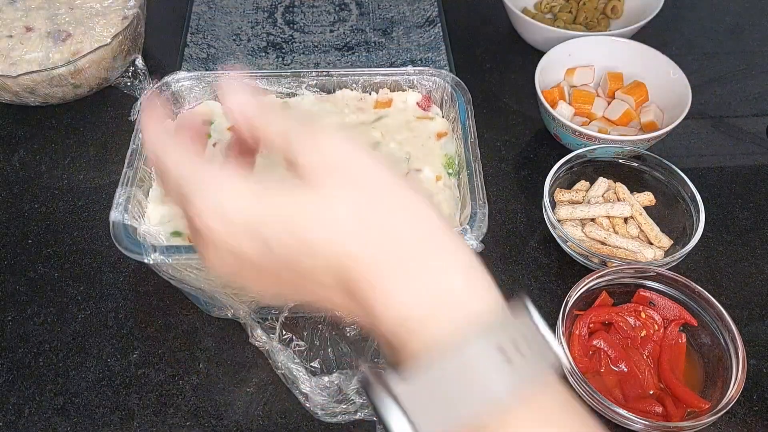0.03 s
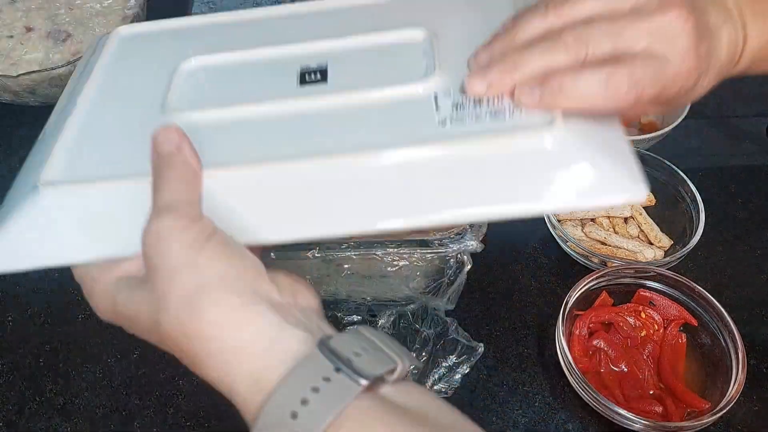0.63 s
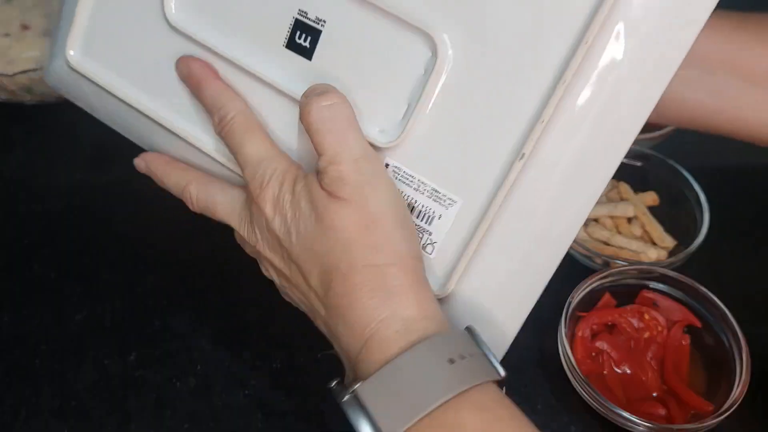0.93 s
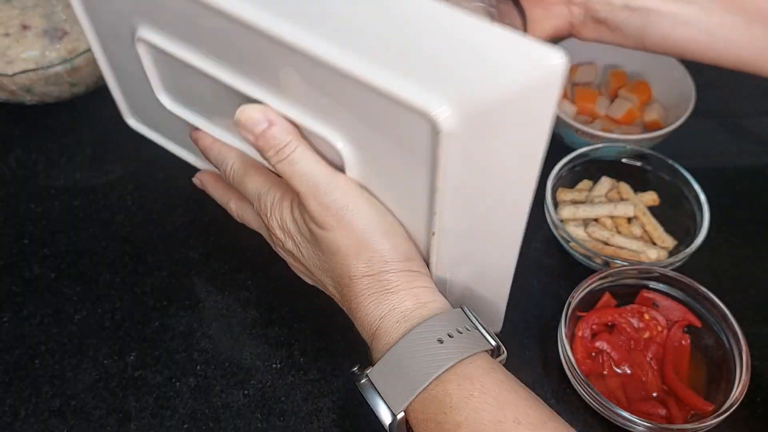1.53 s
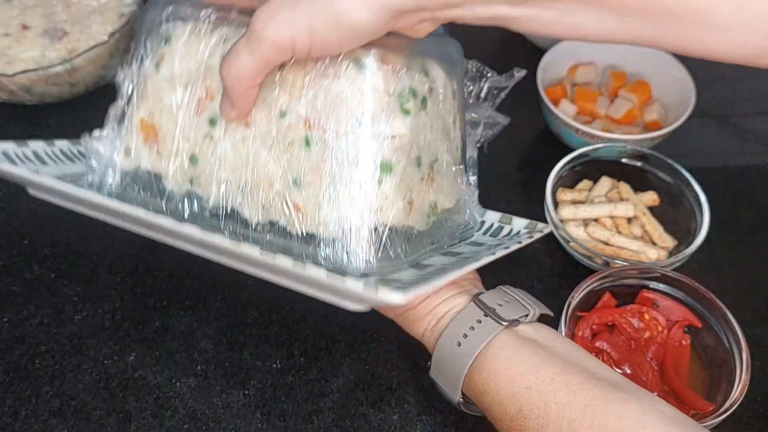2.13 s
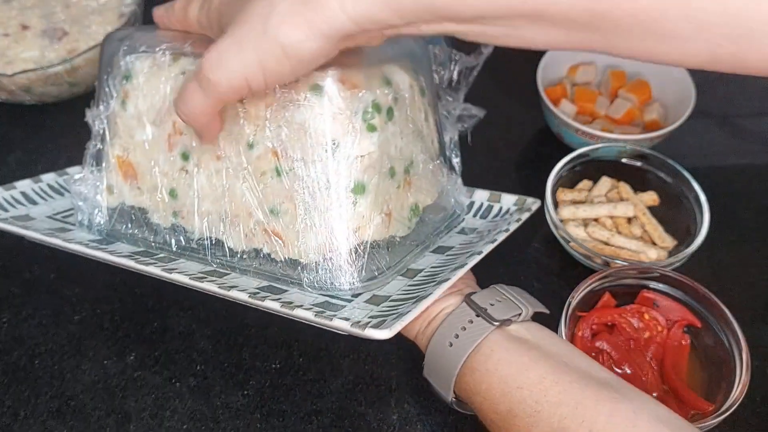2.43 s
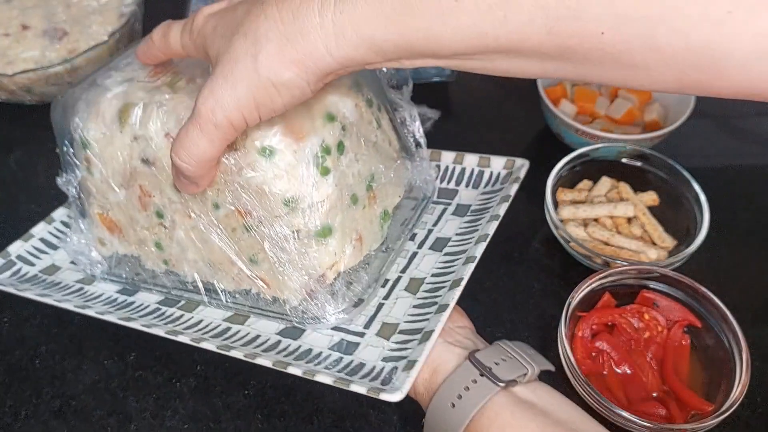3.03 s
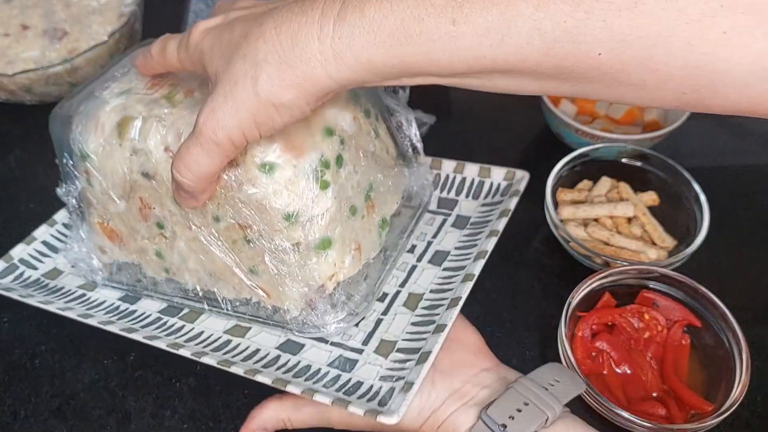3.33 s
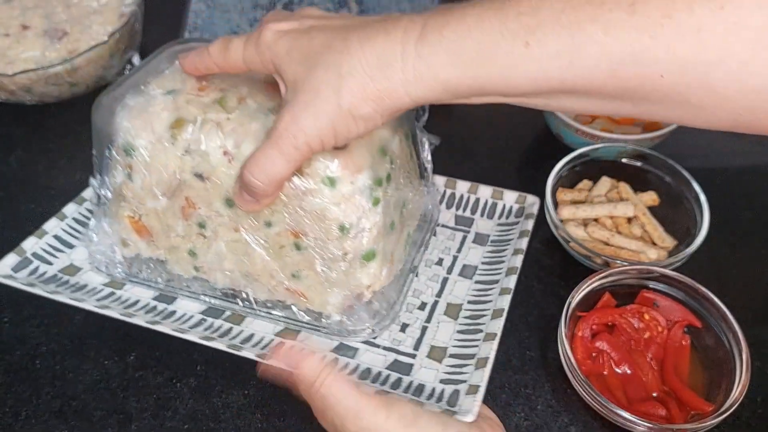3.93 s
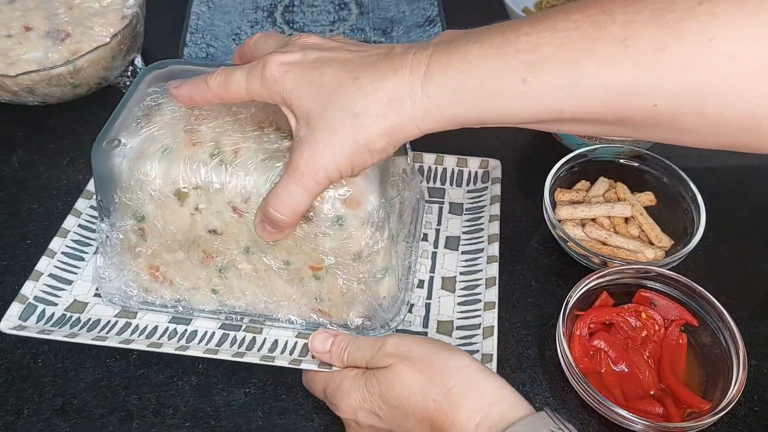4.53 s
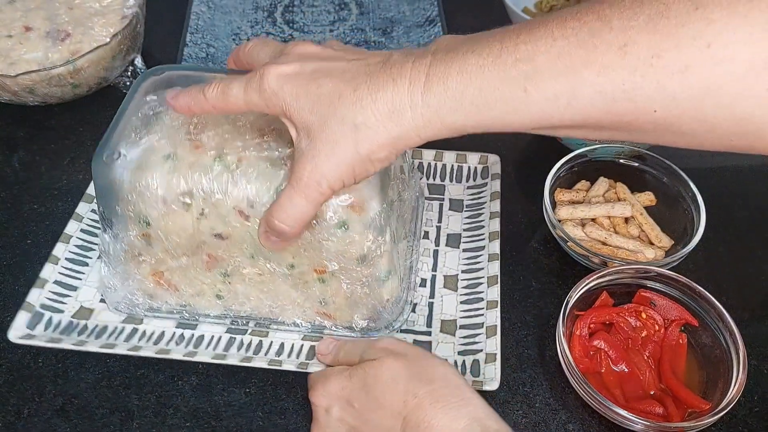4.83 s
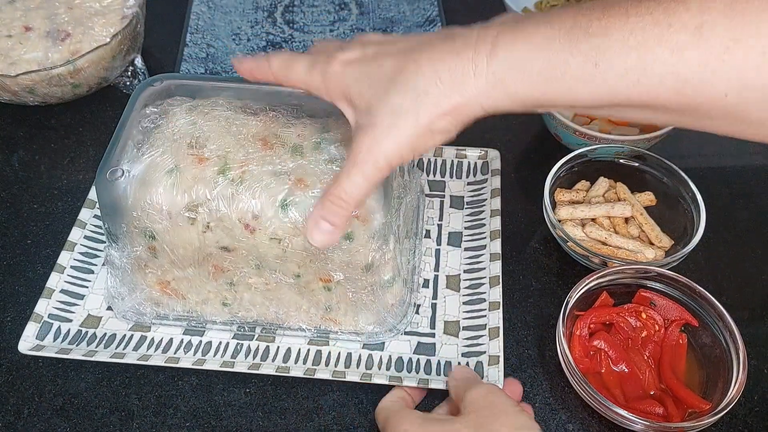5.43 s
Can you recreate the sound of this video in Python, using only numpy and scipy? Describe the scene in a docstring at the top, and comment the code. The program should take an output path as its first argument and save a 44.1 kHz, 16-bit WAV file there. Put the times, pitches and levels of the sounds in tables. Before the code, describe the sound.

A soft bump and a swish of hands open the scene in a small kitchen, heard close with a short room echo. Near 0.9 seconds come a brief squeak, light clinks and a crinkle of cling film, then faint brushing. At 2.2 seconds a filled glass dish, turned over onto a ceramic tray, gives a loud, briefly ringing knock. A smaller knock follows at 2.7 seconds, and the dish rocks with light clinks until about 3. The film rustles, a short falling squeak sounds at 3.1, and the dish rubs dully on the tray. At about 4.15 seconds the tray lands on the counter with the loudest knock and a quick clatter. It scrapes grittily until 4.6, followed by two short chirping nudges. A clink at 5.1 and faint crinkles and taps finish the action. An appliance hums and whines faintly throughout.

```python
"""A filled glass dish in cling film is turned over onto a ceramic serving tray in a small kitchen.
Each impact excites the damped modes of dish and tray; lighter touches make them and a bowl clink.
Stick-slip friction does the rest: the film rustles, hands swish and squeak, the dish rubs,
and the tray, once set down, scrapes over the counter as it is pushed into place.
An appliance hums and whines behind it all."""
import sys
import numpy as np
from scipy import signal
from scipy.fft import rfft, irfft, next_fast_len
from scipy.io import wavfile
from scipy.ndimage import uniform_filter1d

SR = 44100
rng = np.random.default_rng(int(sys.argv[2]) if len(sys.argv) > 2 else 0)


def dump(signal):
    """Clip the signal to [-1, 1] and save it as 16-bit WAV at the path in sys.argv[1]."""
    limited = np.clip(np.atleast_2d(signal).T, -1, 1)
    pcm = np.round(limited * 32767).astype(np.int16)
    wavfile.write(sys.argv[1], SR, pcm)


N = 251255
TIME = np.arange(N) / SR
FFT_SIZE = next_fast_len(N, real=True)

# Modes of the filled glass dish. Each row: frequency in Hz, relative level in dB.
DISH_MODES = [(69.6, -18.5), (137.6, -7.5), (204.3, -9), (510, 3.5), (650, 1), (738, 5.5), (795, 2.5),
              (1168, 3), (1350, 9.5), (1577, 0.5), (2256, -1), (2360, -1), (2532, 9.5), (2985, 3),
              (3110, -4.5), (3765, -3), (4050, -8), (4710, -4.5), (5560, 0), (6350, -8.5), (6508, -3),
              (7860, -4.5), (8200, 0), (10890, -10.5), (12060, -9.5)]
# Noise spectrum of the dish's knocks and of all clinks. Each row: frequency in Hz, relative level in dB.
IMPACT_SPECTRUM = [(50, -16.5), (170, -7.5), (330, -17.5), (580, 1.5), (950, -9.5), (1300, -10.5),
                   (2500, -3.5), (3500, -9.5), (5500, -16.5), (9000, -20.5), (12500, -20), (15500, -20.5)]


def undb(db):
    """Amplitude ratio for a level in decibels."""
    return 10 ** (np.asarray(db) / 20)


def unit(x):
    """Normalisation to an rms of 1."""
    return x / np.sqrt(np.mean(x ** 2) + 1e-30)


def fade(t, t60):
    """Exponential decay, 60 dB down at t60 seconds."""
    return np.exp(-np.log(1000) * t / t60)


def curve(points):
    """Linear interpolation in time between (seconds, value) points."""
    return np.interp(TIME, *np.transpose(points))


def freqs(size):
    """Bin frequencies in Hz of a transform of this size, at least 1 Hz."""
    return np.maximum(np.fft.rfftfreq(size, 1 / SR), 1)


def peak(offset, width):
    """Lorentzian resonance curve, with its full width at half height."""
    return 1 / (1 + (2 * offset / width) ** 2)


def colour(x, spectrum):
    """Spectral shaping by (Hz, dB) points joined on a logarithmic frequency axis."""
    hz, db = np.transpose(spectrum)
    size = next_fast_len(x.shape[-1], real=True)
    gain = undb(np.interp(np.log(freqs(size)), np.log(hz), db))
    return irfft(rfft(x, size) * gain, size)[..., :x.shape[-1]]


def pan(db):
    """Stereo gains for a level difference of left over right."""
    return undb(np.array([[db], [-db]]) / 2)


def diffuse(size, coherent_below_hz=620):
    """A diffuse noise field at two nearby points: coherent in the bass, independent above."""
    mid, side = rng.standard_normal((2, next_fast_len(size, real=True)))
    coherence = .93 / (1 + (freqs(len(mid)) / coherent_below_hz) ** 4)
    common = rfft(mid) * np.sqrt(1 + coherence)
    opposed = np.array([[1], [-1]]) * rfft(side) * np.sqrt(1 - coherence)
    return unit(irfft(common + opposed, len(mid))[:, :size])


def kitchen(x, wet_db=0, room_db=3.5, t60=0.3):
    """Reverberation: direct sound, then dense reflections from counter, cupboards and tiles."""
    t, wet = TIME[:SR // 2], undb(room_db + wet_db)
    response = diffuse(len(t)) * fade(t, t60) * (1 - np.exp(-t / 0.0019))
    response *= wet / np.sqrt(np.sum(response ** 2) / 2)
    response[:, 0] += 1  # direct path
    return signal.fftconvolve(np.atleast_2d(x), response, axes=1)[:, :x.shape[-1]] / np.hypot(1, wet)


def resonate(x, modes, lift_db, width_hz=22, width_share=0.015):
    """Forced response: a body favours frequencies near its modes; high modes are broader."""
    f = freqs(x.shape[-1])
    nearness = sum(peak(f - hz, 2 * (width_hz + width_share * hz)) ** 2 for hz, _ in modes)
    return irfft(rfft(x) * undb(lift_db * np.minimum(nearness, 1.2)), x.shape[-1])


def tones(modes, t60, split=0.0036):
    """Free vibration: each mode decays as a beating pair, slightly detuned with every grip."""
    t = TIME[:SR // 2]
    out = 0
    for hz, db in modes:
        phase = rng.uniform(0, 2 * np.pi, (2, 1, 1))
        # short waves reach the two sides out of step
        phase = phase + min(hz / 1100, .8) * rng.choice([-1, 1]) * np.array([[1], [-1]])
        pair_hz = hz * (1 + split * rng.uniform(-1, 1, (2, 1, 1)))
        main, twin = np.sin(2 * np.pi * pair_hz * t + phase)
        out = out + undb(db) * fade(t, t60) * (main + .5 * twin)
    return out


def friction(slips_per_s, spread_db):
    """Friction as shot noise: tiny slips of uneven strength at random moments."""
    slips = rng.random(FFT_SIZE) < slips_per_s / SR
    strength = undb(spread_db * np.minimum(rng.exponential(size=FFT_SIZE), 4))
    return unit(slips * strength * diffuse(FFT_SIZE))


def judder(pitch_hz, width_hz, slips_per_s):
    """Amplitude modulation: each slip rings briefly at a moving pitch."""
    lowpass = signal.butter(2, width_hz / 2, fs=SR, output="sos")
    slips = signal.sosfilt(lowpass, friction(slips_per_s, spread_db=1.0))
    return unit(slips[:, :N] * np.sin(2 * np.pi * np.cumsum(pitch_hz) / SR))


def flutter(depth_db, samples):
    """Gain that wavers with quick random changes of contact pressure."""
    return undb(depth_db * unit(uniform_filter1d(rng.standard_normal(N), samples)))


def stroke(start, length, skew=1, taper=1):
    """Speed of a hand that accelerates and comes to rest; a skew under 1 makes it peak early."""
    progress = np.clip((TIME - start) / length, 0, 1)
    moving = (progress > 0) & (progress < 1)
    speed = np.zeros(N)
    speed[moving] = np.sin(np.pi * progress[moving] ** skew) ** taper
    return speed


def strokes(rows, skew, taper):
    """Envelope of a series of movements: friction noise follows sliding speed."""
    return sum(undb(db) * stroke(start, length, skew, taper) for start, length, db, *_ in rows)


def room_air(level_db=-62.5):
    """Ambient noise: a steady diffuse field, strongest in the bass."""
    # Each row: frequency in Hz, relative spectral density in dB.
    air_spectrum = [(25, -39), (55, -8.5), (120, -10), (190, -7.5), (370, -12), (750, -21.5), (1100, -33),
                    (1800, -35), (3300, -43.5), (5900, -43.5), (8200, -36), (10000, -44), (12000, -48),
                    (16000, -61)]
    return unit(colour(diffuse(N), air_spectrum)) * undb(level_db)


def appliance():
    """Noise-driven resonances hum and hiss; closely spaced partials beat in a whine."""
    # Each row: frequency in Hz, level in dB, bandwidth in Hz.
    resonances = [(62.5, -78, 8.1), (153.1, -66.5, 3.5), (213.6, -65, 22), (2620, -81.5, 130),
                  (7930, -88, 90)]
    # Each row: frequency in Hz, level in dB before the swell.
    partials = [(2578, -81.5), (2627, -81.5), (2676, -95.5), (2724, -80.5), (2772, -93.5)]
    # Swell of hiss and whine. Each row: time in seconds, gain in dB.
    swell = [(0, -7), (.6, -2), (1.1, 2.5), (1.9, 2), (2.5, 6.5), (5.7, -2)]
    noise, f = rfft(diffuse(FFT_SIZE)), freqs(FFT_SIZE)
    bands = noise * sum(undb(db) * unit(peak(f - hz, width)) for hz, db, width in resonances)
    hum, hiss = (irfft(bands * part, FFT_SIZE)[:, :N] for part in (f < 1000, f >= 1000))
    whine = sum(undb(db) * np.sqrt(2) * np.sin(2 * np.pi * hz * TIME + rng.uniform(0, np.pi, (2, 1)))
                for hz, db in partials)
    return hum + (hiss + whine) * undb(curve(swell))


def hand_brush(level_db=-58, attack_s=0.01, t60=1.5):
    """Dry friction: as a hand brushes past, dense slips merge into a swish that dies away."""
    # Each row: frequency in Hz, relative level in dB.
    skin_spectrum = [(900, -43), (2200, 2), (3100, -1.5), (4600, -7), (6000, -22), (10000, -27)]
    swish = unit(colour(friction(slips_per_s=5200, spread_db=5.0), skin_spectrum)[:, :N])
    return kitchen(swish * undb(level_db) * (1 - np.exp(-TIME / attack_s)) * fade(TIME, t60))


def palm_sweeps():
    """Band-limited friction noise falls in pitch as each palm slides over the back of the tray."""
    # Each row: start and length in seconds, level in dB, first and last pitch in Hz.
    sweeps = [(0.02, 0.18, -62, 3600, 2840), (1.1, 0.23, -71, 2700, 1616), (1.36, .2, -72.5, 1887, 1472)]
    pitch_hz = curve([point for start, length, _, first_hz, last_hz in sweeps
                      for point in ((start, first_hz), (start + length, last_hz))])
    swish = judder(pitch_hz, width_hz=690, slips_per_s=3500)
    return kitchen(swish * strokes(sweeps, skew=0.92, taper=0.61))


def film_rustle(held_db=-71, fold_rise_s=0.0039, fold_t60=0.067):
    """Friction and buckling: cling film rustles under the fingers and crackles as folds give way."""
    # Each row: frequency in Hz, relative level in dB.
    film_spectrum = [(500, -5), (1500, -10), (2500, 1.5), (3500, -0.5), (5000, -1), (6100, -1.5),
                     (7000, -2.5), (8200, -1), (9700, -4), (12100, 0.5), (13500, -3.5), (15500, -3.5)]
    # Fingers dragging over the film. Each row: start and length in seconds, level in dB.
    drags = [(1.05, 0.25, -60), (1.35, 0.23, -65), (2.38, 0.079, -62.5), (2.54, 0.13, -58),
             (2.71, 0.1, -51), (2.812, 0.031, -46), (2.895, 0.06, -46), (3.04, 0.17, -59.5),
             (3.17, 0.25, -53), (3.39, 0.41, -61.5), (3.6, 0.26, -63), (3.87, 0.11, -60),
             (4.05, 0.14, -64.5), (4.3, 0.36, -53.5), (5.46, 0.86, -58)]
    # Each row: start in seconds, level in dB.
    crinkles = [(0.848, -45), (0.879, -40), (3.04, -39), (3.622, -49), (5.27, -42), (5.327, -50.5),
                (5.535, -47)]
    crackle = unit(colour(friction(slips_per_s=1300, spread_db=3.8), film_spectrum)[:, :N])
    folds = sum(undb(db) * np.clip((TIME - s) / fold_rise_s, 0, 1) * fade(np.abs(TIME - s), fold_t60)
                for s, db in crinkles)
    held = undb(held_db) * stroke(start=0.89, length=5.4)  # a faint stir while the dish is held
    envelope = np.sqrt(strokes(drags, skew=0.66, taper=0.99) ** 2 + folds ** 2 + held ** 2)
    return kitchen(crackle * envelope * flutter(2.3, samples=500), wet_db=3.0) * pan(-0.61)


def squeaks(settle_s=0.00594, roughness=0.097):
    """Stick-slip oscillation of damp skin and film on the glaze; the pitch falls as the slip slows."""
    # Each row: start and length in seconds, first and settled pitch in Hz, level in dB.
    slips = [(0.857, 0.02, 475, 460, -33.5), (3.117, 0.039, 1274, 754, -32)]
    out = np.zeros(N)
    for s, length, first_hz, settled_hz, db in slips:
        t, start = TIME[:int(length * SR)], int(s * SR)
        waver = unit(uniform_filter1d(rng.standard_normal(len(t)), size=60))
        glide_hz = settled_hz + (first_hz - settled_hz) * np.exp(-t / settle_s)
        phase = 2 * np.pi * np.cumsum(glide_hz * (1 + roughness * waver)) / SR
        swell = np.sin(np.pi * (t / length) ** 0.91)
        out[start:start + len(t)] += undb(db) * swell * (np.sin(phase) + undb(-31) * np.sin(2 * phase))
    return kitchen(out, wet_db=-8.5)


def dish_rub():
    """Forced vibration: friction of the wrapped dish and the hand on the tray drives the dish's modes."""
    # Each row: frequency in Hz, relative level in dB.
    rub_spectrum = [(80, -5), (220, 3.5), (350, 3.5), (750, 2), (1050, -7), (1400, -4), (2300, -4),
                    (3200, -22), (4500, -28), (7000, -29)]
    # Each row: start and length in seconds, level in dB.
    rubs = [(-.04, 0.075, -44), (.02, 0.44, -63.5), (2.52, 0.14, -55.5), (2.75, 0.31, -51.5),
            (3.03, 0.25, -48.5), (3.205, 0.18, -46.5), (3.42, 0.15, -48), (3.6, .11, -50.5),
            (3.7, 0.31, -57.5), (4.08, 0.19, -51.5)]
    drive = colour(friction(slips_per_s=1300, spread_db=-1.5), rub_spectrum)
    body = unit(resonate(drive, DISH_MODES, lift_db=4.5)[:, :N])
    return kitchen(body * strokes(rubs, skew=0.5, taper=0.63)) * pan(-1.0)


def clinks(modes, touches, t60, tick_db, wet_db, tick_t60=0.075):
    """Light impacts: a tick and a few clear modes, weighted by the point of contact."""
    t = TIME[:SR // 2]
    out = np.zeros((2, N))
    for s, db, favoured_hz, boost_db in touches:
        struck = [(hz, level + boost_db * peak(hz / favoured_hz - 1, 0.2)) for hz, level in modes]
        ringing = unit(tones(struck, t60))
        tick = unit(colour(diffuse(len(t)), IMPACT_SPECTRUM) * fade(t, tick_t60))
        clink = ringing + undb(tick_db) * tick
        start = int(s * SR)
        out[:, start:start + len(t)] += clink / clink[:, :SR // 30].std() * undb(db)
    return kitchen(out, wet_db)


def tableware():
    """Modal ringing of a grazed glass bowl, the lifted tray and the dish seated on the tray."""
    # Each row: frequency in Hz, relative level in dB.
    bowl_modes = [(980, -2), (1480, 2.5), (2099, 1.5), (5700, -11), (6465, -13)]
    free_tray_modes = [(850, -1.5), (1440, 0), (2320, -1.5), (3320, -1), (4570, -3), (5800, -7),
                       (8000, -1.5)]
    seated_dish_modes = [(1950, 3), (2130, 11), (2240, 6.5), (2480, -8), (2830, 1), (3860, -21),
                         (4715, -2.5), (4870, -4), (5518, -6), (5955, -9), (7860, -7.5)]
    # Each row: start in seconds, level in dB, favoured frequency in Hz, its boost in dB.
    bowl_touches = [(.249, -53, 2099, 1.5)]
    free_tray_touches = [(0.857, -58, 1440, 5), (0.878, -51.5, 850, 3), (0.8834, -50.5, 4570, 4)]  # as the tray is lifted and lowered onto the dish
    seated_dish_taps = [(2.7074, -37, 2830, 3.5), (2.901, -50, 4715, -6), (2.926, -48, 5955, 9),
                        (3.0425, -51, 5955, 21)]  # as the dish rocks
    return (clinks(bowl_modes, bowl_touches, t60=0.24, tick_db=-4.0, wet_db=-14.0)
            + clinks(free_tray_modes, free_tray_touches, t60=0.12, tick_db=-4.5, wet_db=-10.5)
            + clinks(seated_dish_modes, seated_dish_taps, t60=0.12, tick_db=-12.5, wet_db=-12.0))


def scrape_pitch(pushes, rise_hz_per_s=325):
    """Linear glide: within each push the scrape climbs from its starting pitch."""
    pitch_hz = np.full(N, float(pushes[0][3]))
    for start, _, _, hz in pushes:
        pitch_hz = np.where(TIME > start, hz + rise_hz_per_s * np.minimum(TIME - start, .5), pitch_hz)
    return pitch_hz


def through_foot(x, width_hz=80):
    """Resonant filtering: scraping enters the tray where its foot presses on the counter."""
    # Each row: frequency in Hz, boost in dB.
    resonances = [(835, 4.5), (1030, 2.5), (1430, 9), (1915, 11.5), (2400, 7.5), (3110, 6), (3830, 12),
                  (4900, 18.5)]
    lift_db = sum(db * peak(freqs(FFT_SIZE) - hz, width_hz) for hz, db in resonances)
    return unit(irfft(rfft(x, FFT_SIZE) * undb(lift_db), FFT_SIZE)[:, :N])


def tray_slide(chirp_db=2.0):
    """Stick-slip friction: the tray grinds over the counter, then two nudges swell to gritty chirps."""
    # Each row: frequency in Hz, relative level in dB.
    grit_spectrum = [(150, -40), (400, -4.5), (700, -0.5), (1000, 0.5), (1450, -2), (1900, -3.5),
                     (2400, -5), (3150, -8.5), (3550, -16.5), (4250, -21), (4900, -26), (6200, -29.5),
                     (12000, -37)]
    # Each row: start and length in seconds, level in dB, starting pitch in Hz.
    pushes = [(4.245, 0.35, -36.5, 813), (4.312, 0.041, -40.5, 850), (4.372, 0.051, -43, 800),
              (4.415, 0.049, -41, 850), (4.488, 0.038, -38.5, 902.5), (4.585, 0.031, -49, 917)]
    nudges = [(4.712, 0.071, -43.5, 1120), (4.84, 0.074, -42, 1080)]
    grit = unit(colour(friction(slips_per_s=420, spread_db=3.6), grit_spectrum)[:, :N])
    scrape = through_foot(grit + judder(scrape_pitch(pushes), width_hz=310, slips_per_s=630))
    dull_grit = signal.lfilter(*signal.butter(1, 2300, fs=SR), grit)
    light_grit = unit(signal.sosfilt(signal.butter(2, 850, "highpass", fs=SR, output="sos"), dull_grit))
    chatter = judder(scrape_pitch(nudges), width_hz=250, slips_per_s=900)
    chirp = through_foot(light_grit + undb(chirp_db) * chatter)
    moves = scrape * strokes(pushes, skew=0.67, taper=0.65)
    moves += chirp * strokes(nudges, skew=1.96, taper=1.2)
    return kitchen(moves * flutter(2.7, samples=300), wet_db=-1.5)


def ring(modes, spectrum, t60, weak_db, crack_db, crack_t60, snap_db, spacing_hz=40):
    """Impulse response of a body: a snap, a noisy crack, clear modes and a crowd of weaker ones."""
    t = TIME[:SR // 2]
    noise, f = rfft(diffuse(len(t))), freqs(len(t))
    present = rng.random(len(f)) < SR / len(t) / spacing_hz  # weak modes lie at random frequencies
    weak = colour(irfft(noise * present * (f > 400), len(t)), spectrum) * fade(t, t60=0.27)
    burst = colour(diffuse(len(t)), spectrum)
    burst = resonate(burst, modes, lift_db=7.0, width_hz=69.0, width_share=0.022)
    crack = burst * (fade(t, crack_t60) + undb(snap_db) * fade(t, t60=0.011))
    attack = 1 - np.exp(-t / .0005)
    return unit(unit(tones(modes, t60)) + undb(weak_db) * unit(weak) + undb(crack_db) * unit(crack)) * attack


def knocks(trim_db=-4.5):
    """Impacts excite dish and tray; weight and hardness of contact set the level of four registers."""
    # Each row: start in seconds, relative levels of thud, body, clink and edge in dB, frequency
    # favoured by the point of contact in Hz, its boost in dB, the tray's share of the ring from 0 to 1.
    impacts = [(0.006, -49.5, -55, -70, -72, 980, 14, 0.57), (2.174, -28.5, -18, -16, -19.5, 1213, 1, 0.1),
               (2.534, -87, -44, -68, -63, 726, 4, 0), (2.707, -39.5, -24.5, -34.5, -62, 790, -6, 0.74),
               (2.838, -43.5, -36, -49, -63, 590, 6, 0.58), (2.8992, -45, -34, -52, -60, 755, -9, 0.62),
               (2.924, -37, -40, -46.5, -55, 3800, 3, 0.77), (2.942, -42, -42.5, -45, -62, 2070, 21, 0.8),
               (3.042, -80, -35.5, -52.5, -57, 810, 3, 0.5), (3.776, -52, -49, -66, -79, 785, 1, 0.6),
               (4.148, -49.5, -27, -46, -54.5, 790, 7, 0.96),
               (4.1501, -35.5, -14, -11.5, -29, 4700, -2.5, 0.95),
               (4.189, -30, -34, -24.5, -35, 2300, 0, 0.99), (4.215, -40, -30.5, -29.5, -44, 3890, 3, 0.94),
               (5.0602, -49, -49, -33, -58, 1600, 4.5, 0.64),
               (5.224, -70, -81.5, -60, -63.5, 2046, -13, 0.3),
               (5.276, -53.5, -72, -62.5, -80, 1460, 13, 0.38),
               (5.622, -46.5, -73.5, -56.5, -62, 1396, 7.5, 0.76)]
    # Thud, body, clink and edge. Each row: lower and upper limit in Hz.
    bands_hz = [(45, 283), (470, 930), (1120, 3620), (3600, 16000)]
    # Modes and impact noise of the ceramic tray. Each row: frequency in Hz, relative level in dB.
    tray_modes = [(221.8, 4), (471.6, 3), (715, 7), (781.5, 4.5), (837, 0.5), (1068, 2), (1440, -3.5),
                  (1915, -12), (2250, 3.5), (2423, 10.5), (2650, -0.5), (3100, -11), (3890, 5.5),
                  (4605, -4.5), (5750, -18.5), (8080, -17.5)]
    tray_spectrum = [(50, -41.5), (115, -21.5), (210, -15), (320, -9.5), (480, -5), (800, -3), (1050, -4.5),
                     (1700, -3), (2450, -8), (3100, -12), (4500, -19), (6000, -23.5), (8500, -24.5),
                     (15000, -49.5)]
    out = np.zeros((2, N + SR))
    registers = [signal.butter(3, band, "bandpass", fs=SR, output="sos") for band in bands_hz]
    for s, *levels_db, favoured_hz, boost_db, tray_share in impacts:
        harsh_db = 0.077 * max(levels_db)  # hard blows crack, light touches ring more purely
        dish = ring(DISH_MODES, IMPACT_SPECTRUM, t60=0.24, weak_db=-1.5,
                    crack_db=1.5 + harsh_db, crack_t60=0.34, snap_db=1.0)
        tray = ring(tray_modes, tray_spectrum, t60=0.23, weak_db=-0.5,
                    crack_db=9.0 + harsh_db, crack_t60=0.22, snap_db=10.5)
        blow = np.sqrt(1 - tray_share) * dish + np.sqrt(tray_share) * tray
        # modes with an antinode at the point of contact ring louder
        blow += undb(boost_db) * signal.lfilter(*signal.iirpeak(favoured_hz, 10, fs=SR), blow)
        start = int(s * SR)
        for bandpass, db in zip(registers, levels_db):
            part = signal.sosfilt(bandpass, blow)
            out[:, start:start + part.shape[1]] += part / part[:, :SR // 30].std() * undb(db + trim_db)
    return out[:, :N]


def scene():
    """Superposition of all sources in stereo."""
    impacts = tableware() + knocks()
    rubbing = squeaks() + film_rustle() + dish_rub() + hand_brush() + palm_sweeps() + tray_slide()
    return impacts + rubbing + room_air() + appliance()


def record(dry):
    """Clipping at full scale, then a steep low-pass that limits the bandwidth."""
    lowpass = signal.ellip(10, .2, 80, 15850, fs=SR, output="sos")
    return signal.sosfilt(lowpass, np.clip(dry, -1, 1))


dry = scene()
out = record(dry)
dump(out)
```